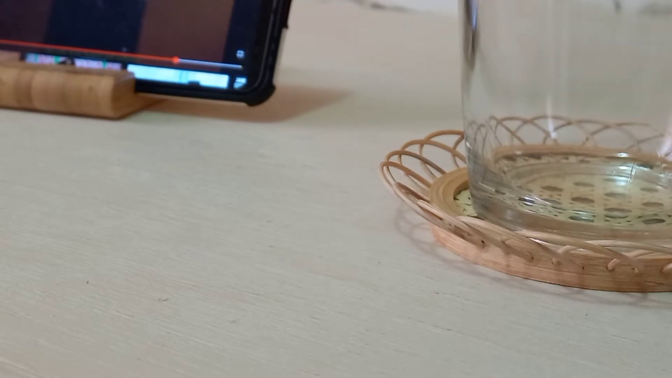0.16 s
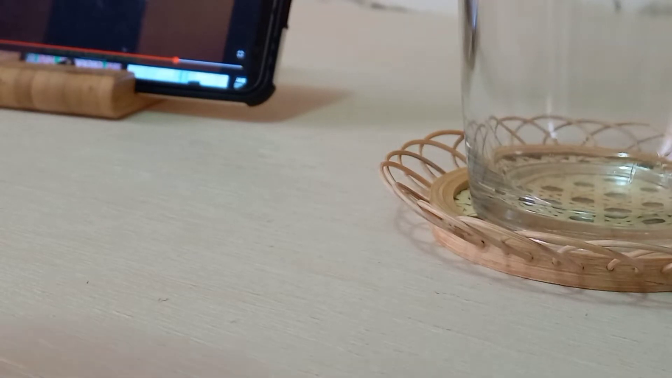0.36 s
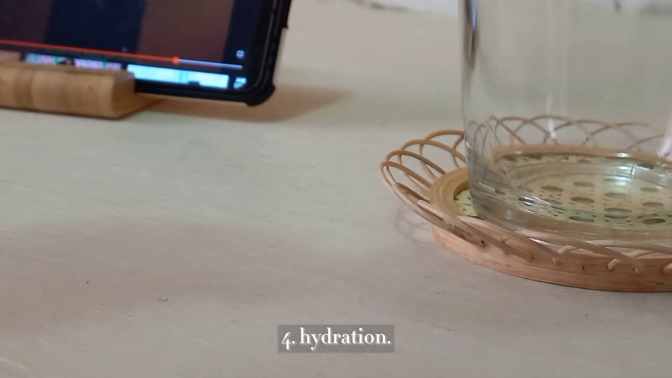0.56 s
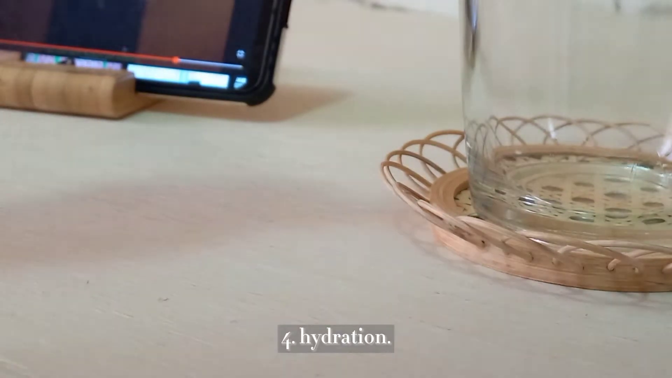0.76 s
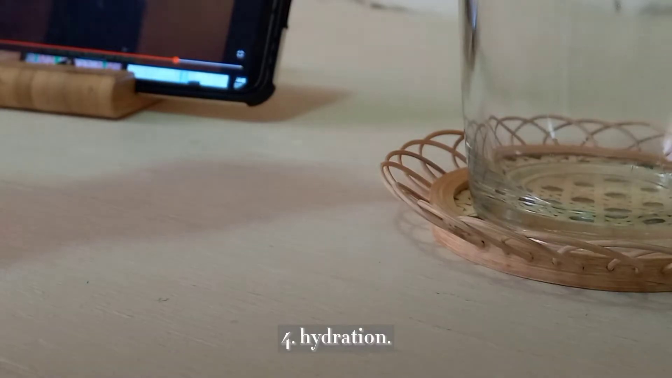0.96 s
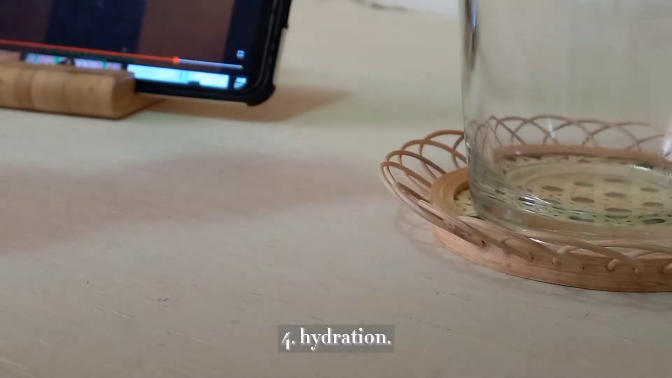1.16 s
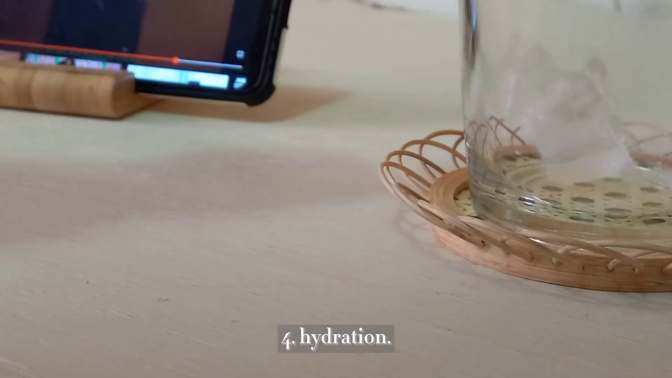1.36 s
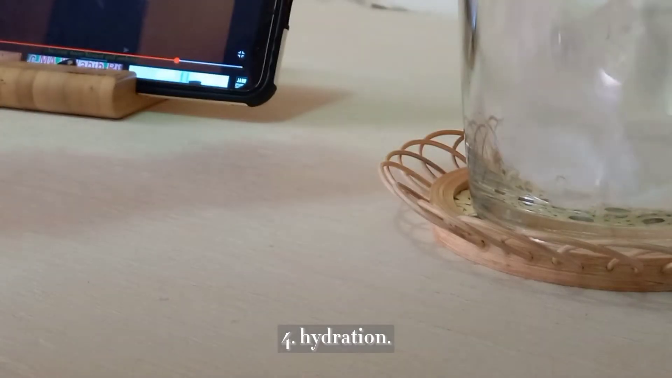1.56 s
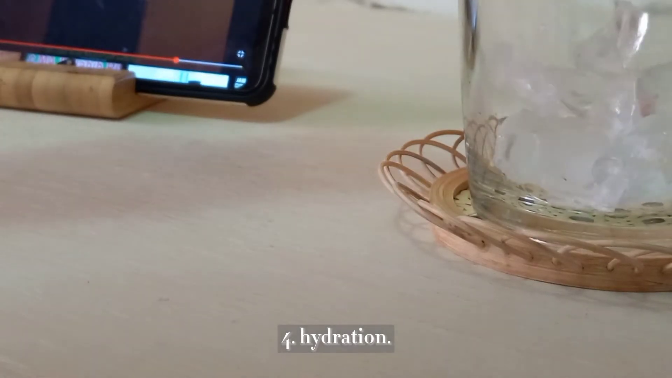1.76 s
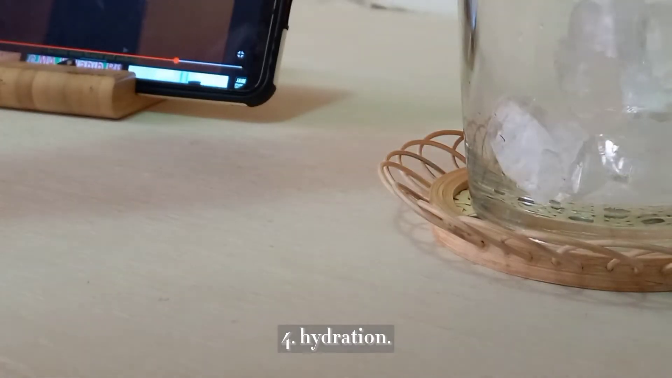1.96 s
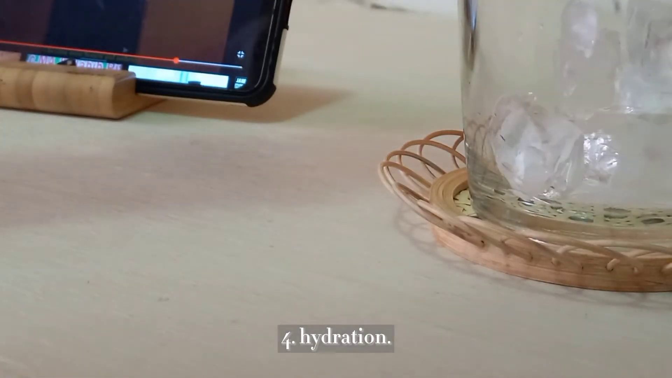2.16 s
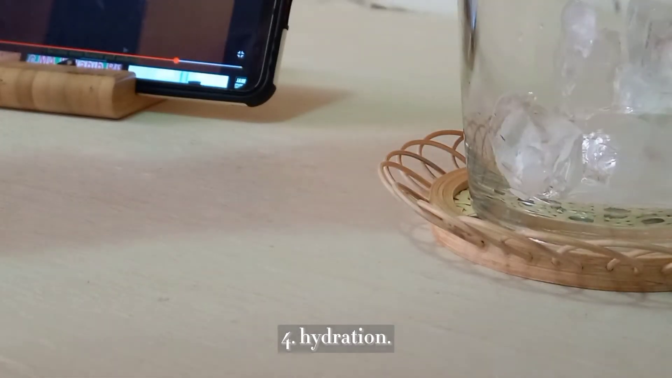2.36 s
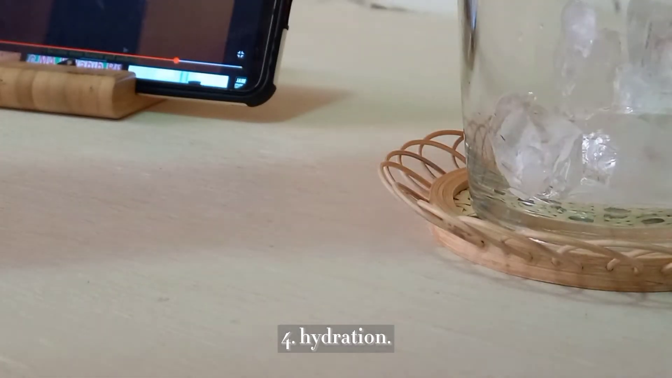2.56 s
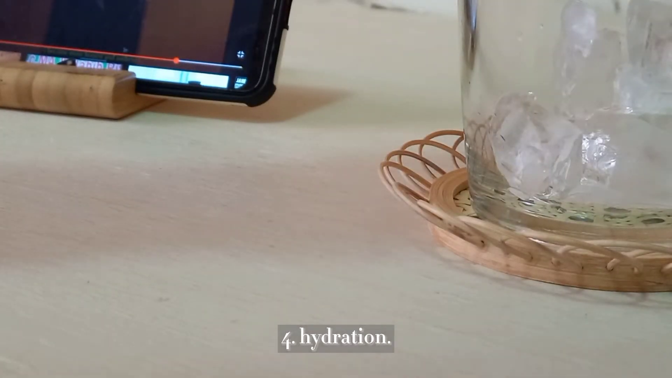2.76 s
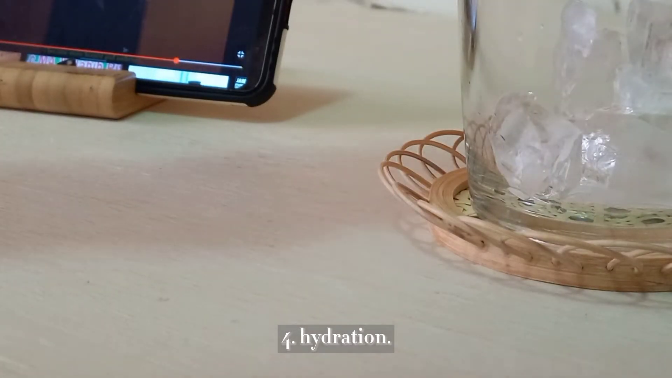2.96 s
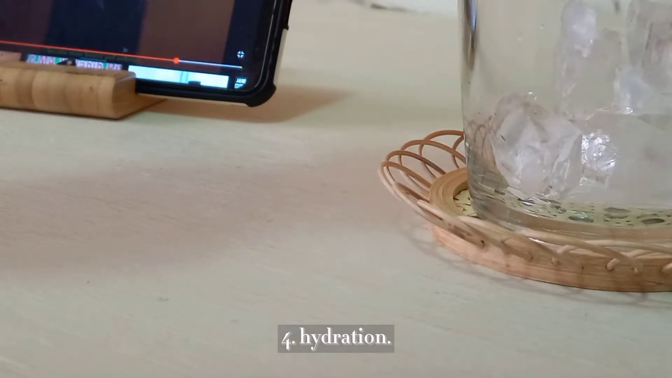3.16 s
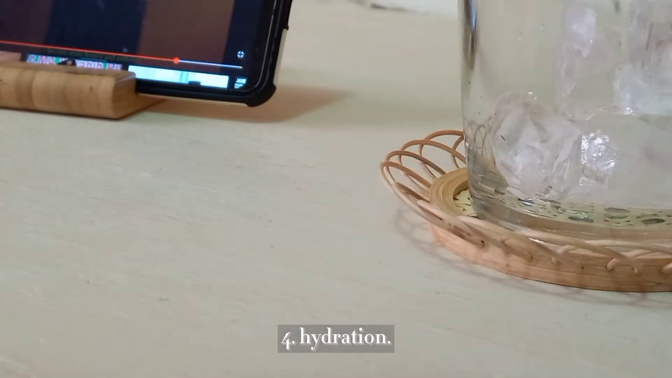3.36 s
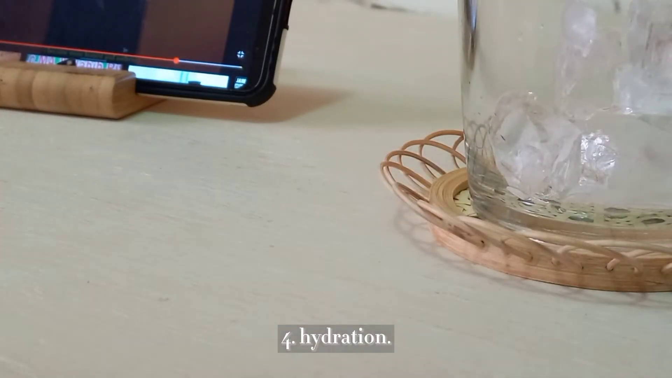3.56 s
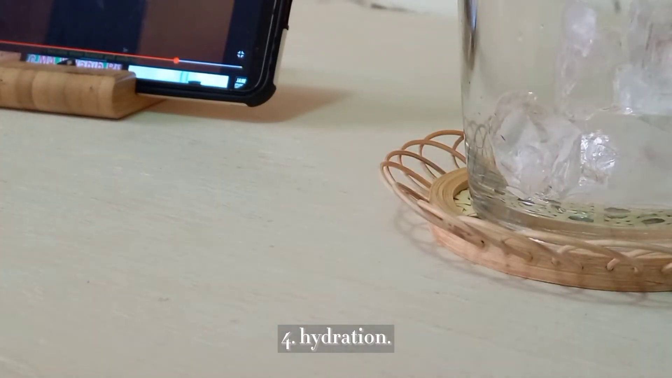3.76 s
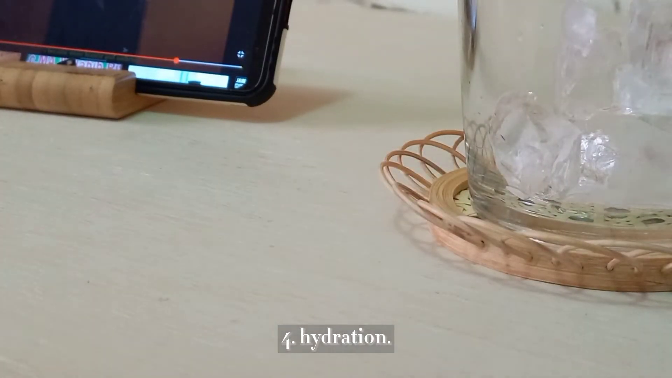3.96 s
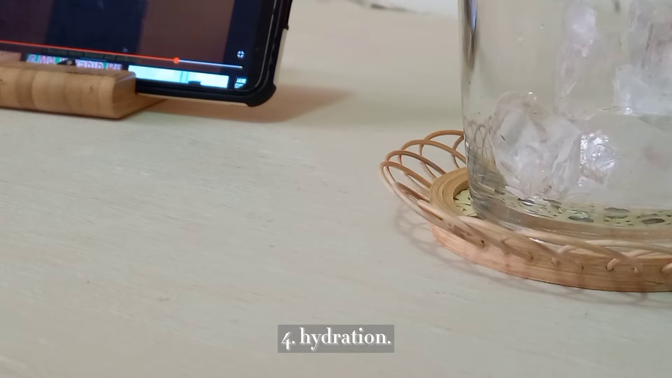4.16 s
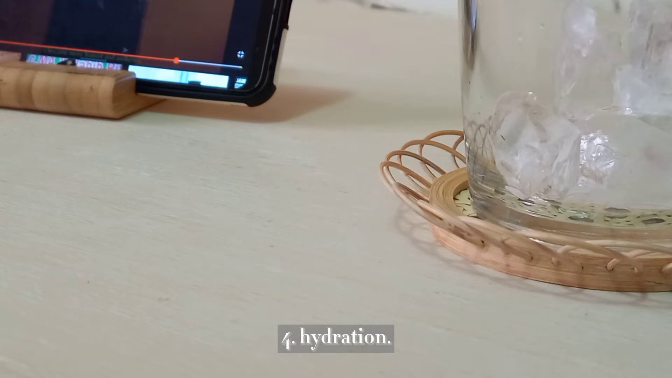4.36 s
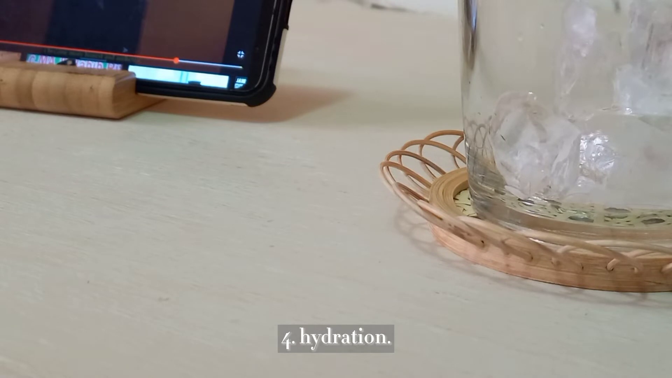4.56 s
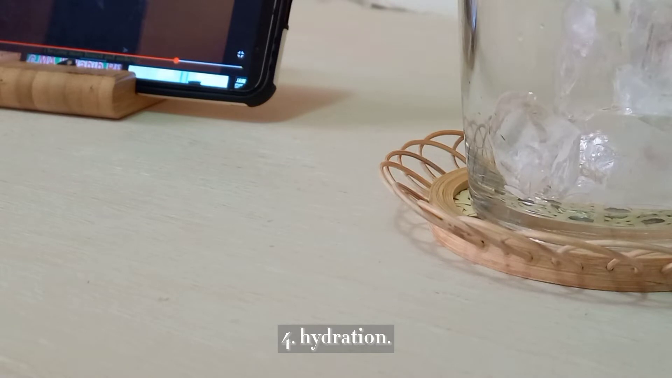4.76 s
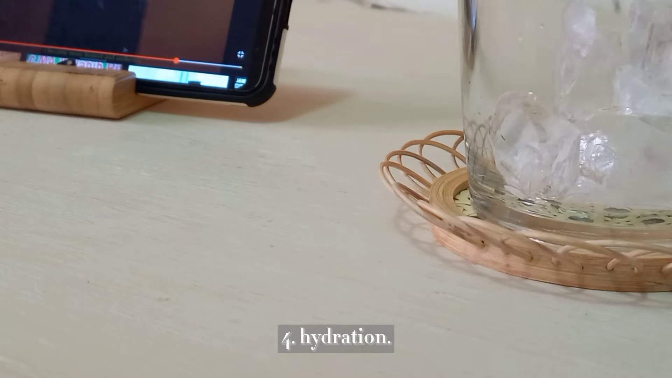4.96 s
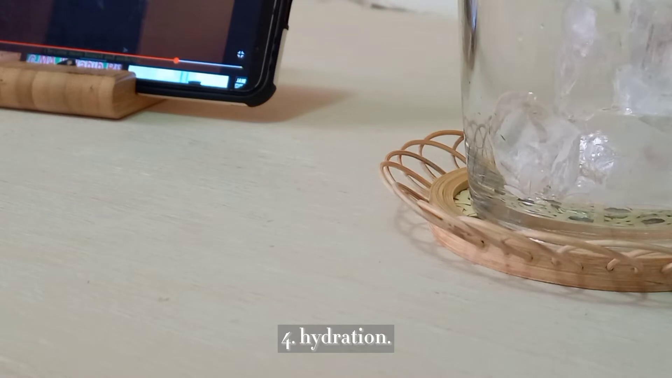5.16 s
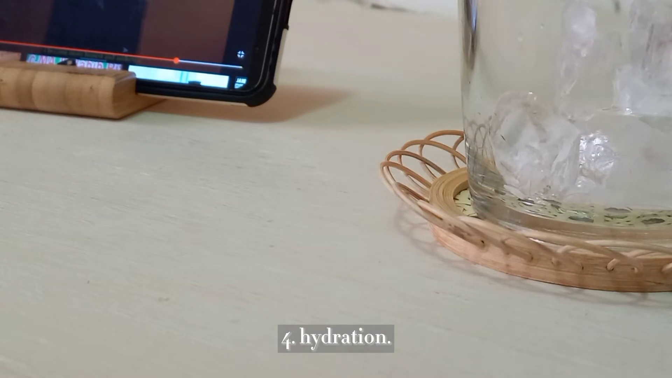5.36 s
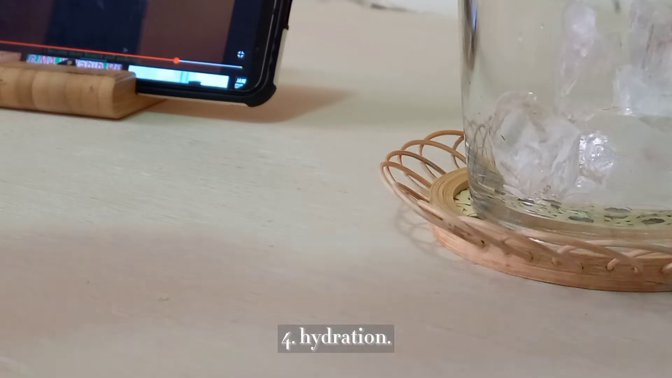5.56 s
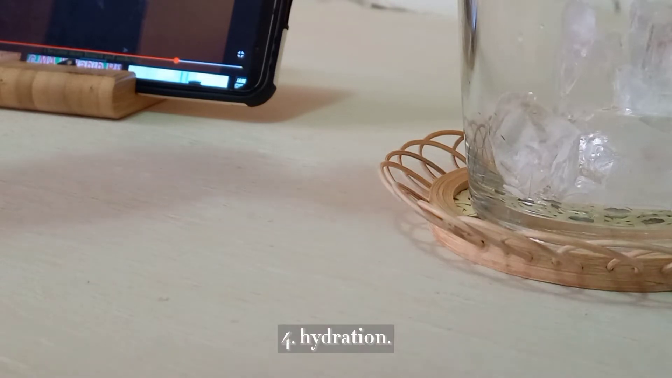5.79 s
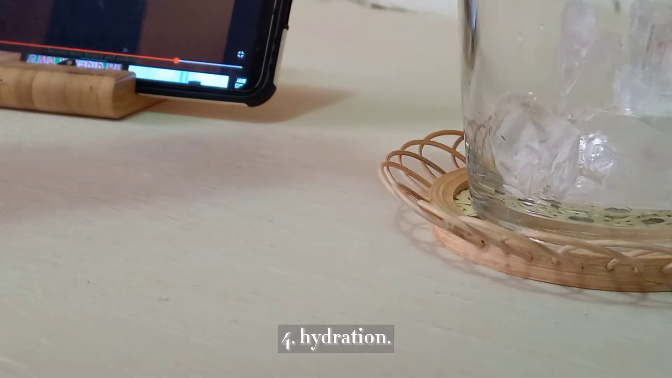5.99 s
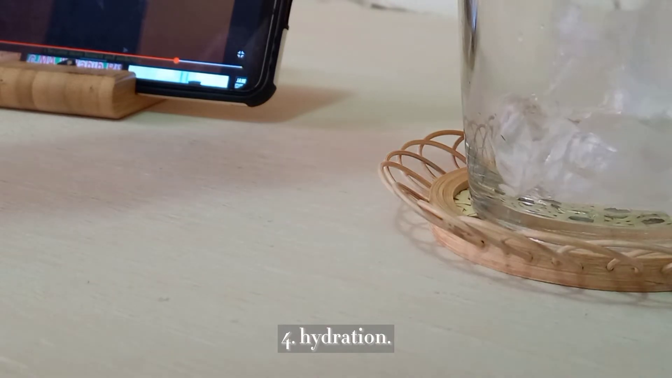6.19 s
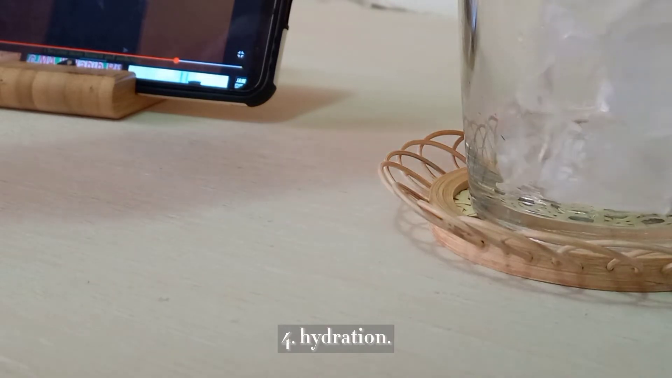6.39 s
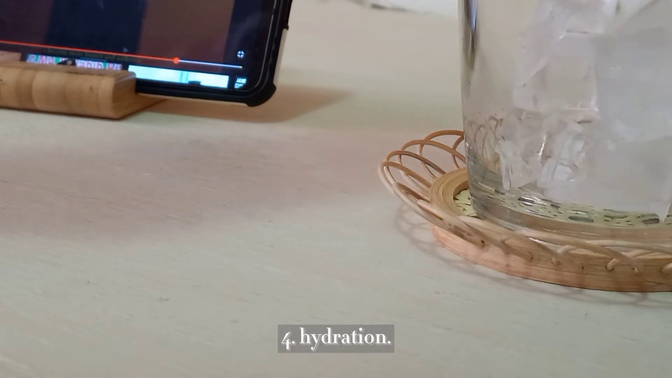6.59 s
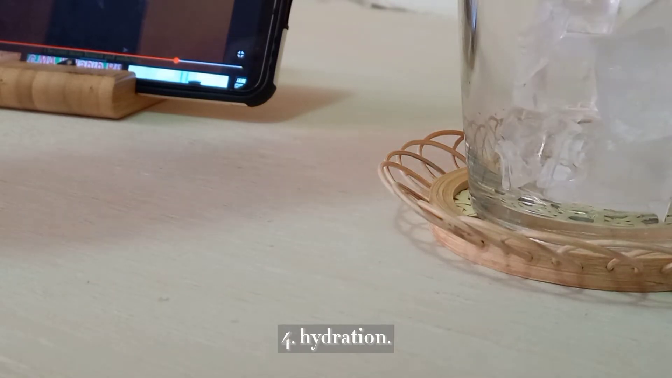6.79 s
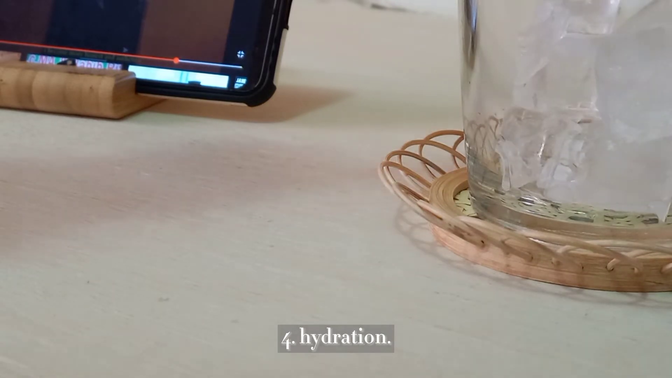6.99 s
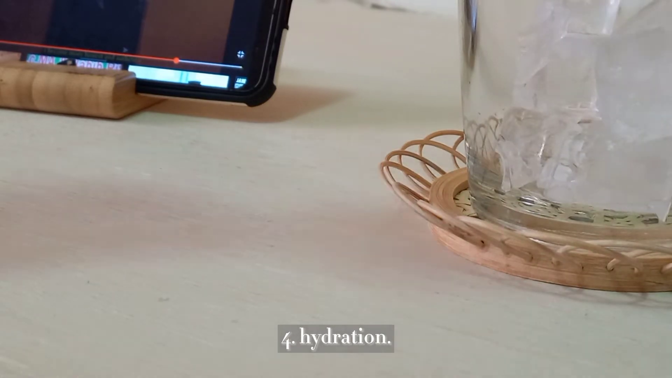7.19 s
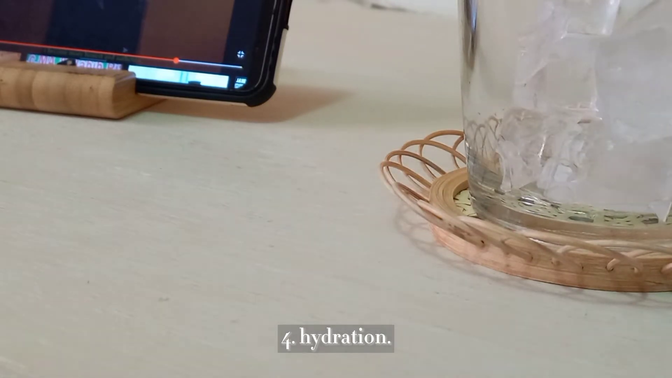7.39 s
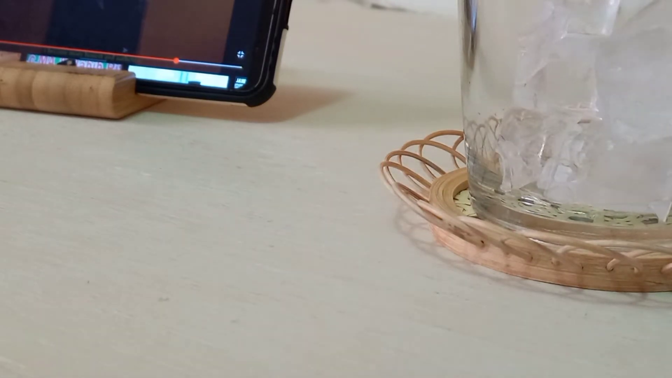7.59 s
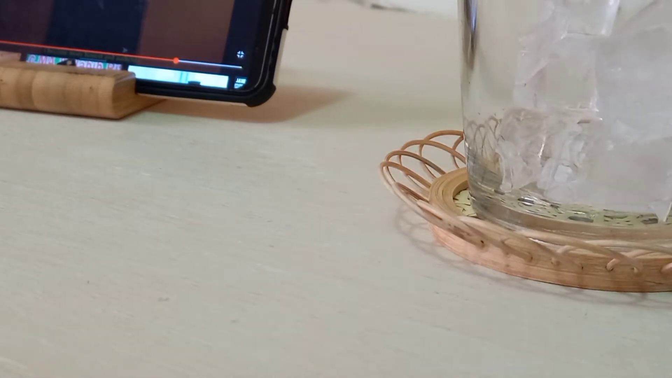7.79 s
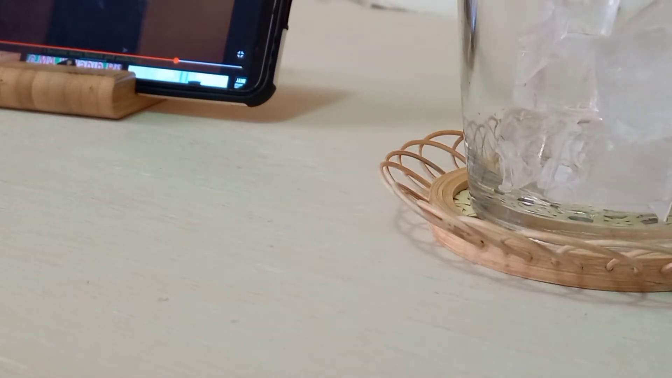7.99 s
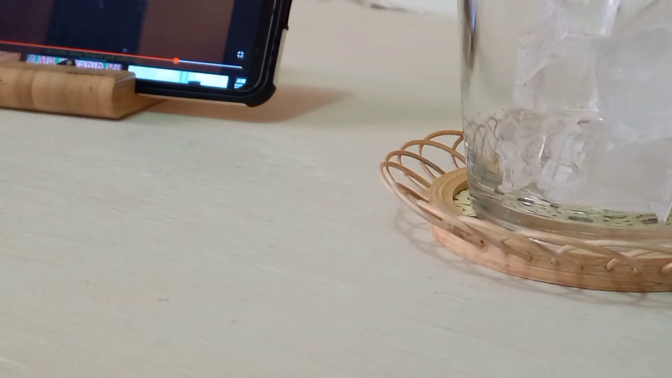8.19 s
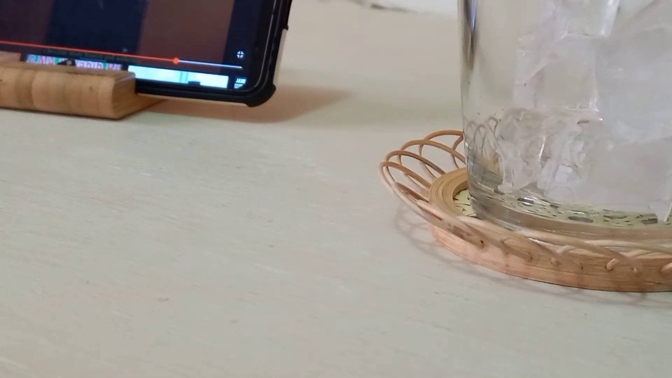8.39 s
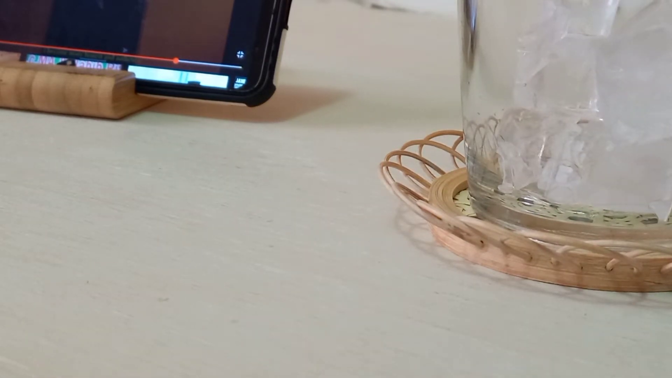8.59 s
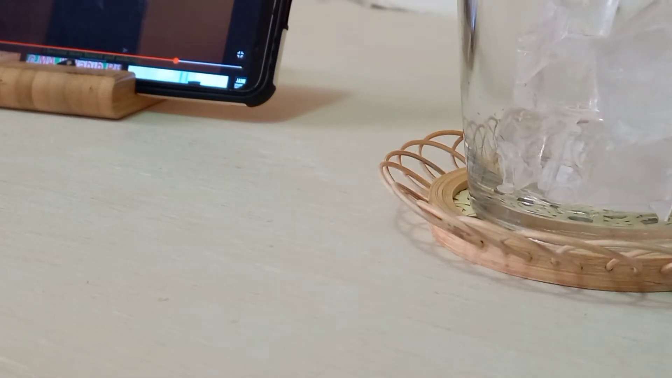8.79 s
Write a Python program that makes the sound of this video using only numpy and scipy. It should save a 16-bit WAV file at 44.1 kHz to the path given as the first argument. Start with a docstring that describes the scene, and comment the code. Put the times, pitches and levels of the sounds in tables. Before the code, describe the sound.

Quiet small room, faint hum, a dull bump or two in the background. Ice cubes then hit a glass very near the microphone: sharp ticks, clear high ringing, rattling as they settle. Further away, hands dig in a tub of ice with hollow knocks and gritty crunches. Another quick cluster of cubes clatters into the now partly filled glass, followed by a pause and softer rummaging in the ice.

```python
"""A drinking glass, close to the microphone, rings as two handfuls of ice cubes are dropped into it.
Its wall is a set of decaying modes, damped by the cubes that lean on it; each cube cracks and chatters.
The glass stands on a wicker coaster, and the table gives low notes under some of the landings.
Further away, in between and afterwards, more ice is dug out of a tub: noise grains crunch, lumps knock.
Behind it are dull bumps across the small room, noise for its air, and two low hum tones."""
import sys
import numpy as np
from scipy import signal
from scipy.fft import rfft, irfft, next_fast_len
from scipy.io import wavfile
from scipy.ndimage import uniform_filter1d

SR = 44100
rng = np.random.default_rng(int(sys.argv[2]) if len(sys.argv) > 2 else 0)


def store_wav(level_fs):
    """Save 16-bit WAV to argv[1]."""
    pcm = np.round(np.clip(np.atleast_2d(level_fs), -1, 1) * 32767)
    wavfile.write(sys.argv[1], SR, pcm.T.astype(np.int16))


N = 389844
TIME = np.arange(N) / SR


def from_db(db):
    """Decibels to gain."""
    return 10 ** (np.asarray(db) / 20)


def rms_one(x):
    """Scale to unit rms."""
    return x / np.sqrt(np.mean(x ** 2) + 1e-20)


def at_hz(points, hz):
    """Read a table on a log-frequency axis."""
    points = np.array(points)
    return np.interp(np.log(np.maximum(hz, 1)), np.log(points[:, 0]), points[:, 1])


def add(out, s, sound):
    """Mix a sound in at a time in seconds."""
    start = max(round(s * SR), 0)
    out[:, start:start + sound.shape[-1]] += sound[..., :N - start]


def pan(left_db):
    """Left and right gains of constant power, the left louder by left_db."""
    return rms_one(from_db(np.array([[left_db], [-left_db]]) / 2))


def cut(x, hz, kind, order=2):
    """Butterworth filter."""
    sections = signal.butter(order, hz, kind, fs=SR, output="sos")
    return signal.sosfilt(sections, x + 1e-18)


def coloured(x, spectrum, size=8192):
    """Minimum-phase body filter with this spectrum; white noise keeps its power."""
    hz = np.arange(size // 2 + 1) * SR / size
    gain = rms_one(from_db(at_hz(spectrum, hz)))
    # folding the cepstrum onto positive time makes the filter causal
    cepstrum = irfft(np.log(gain))
    cepstrum[1:size // 2] *= 2
    cepstrum[size // 2 + 1:] = 0
    response = irfft(np.exp(rfft(cepstrum)))
    return signal.fftconvolve(x, response[None], axes=1)[:, :N]


# likeness of the two microphone ports: (frequency [Hz], left-right likeness [0 to 1])
PORT_LIKENESS = [(100, .93), (300, 0.88), (700, 0.59), (1400, 0.025), (3000, 0)]


def two_ports(x):
    """Long waves reach both microphone ports alike, short ones do not."""
    size = next_fast_len(N)
    left, right = rfft(x, size)
    likeness = at_hz(PORT_LIKENESS, np.arange(len(left)) * SR / size)
    angle = np.arcsin(np.clip(likeness, -1, 1)) / 2
    mixed_left = left * np.cos(angle) + right * np.sin(angle)
    mixed_right = right * np.cos(angle) + left * np.sin(angle)
    return irfft([mixed_left, mixed_right], size)[:, :N]


def swells(rows, attack_s, release_t60):
    """Gain in time for rows of (start s, length s, dB): each rises, holds and dies away; powers add."""
    power = np.zeros(N)
    for start, length, db in rows:
        t = np.arange(int((length + release_t60) * SR)) / SR
        fall_db = -60 * np.maximum(t - length, 0) / release_t60
        gain = np.minimum(t / attack_s, 1) * from_db(db + fall_db)
        add(power[None], start, gain ** 2)
    return np.sqrt(power)


def snap(t60, click_db, size=4096):
    """A brittle contact: one click and a short splintering burst, of unit energy in each channel."""
    burst = rng.standard_normal((2, size)) * from_db(-60 * np.arange(size) / SR / t60)
    burst /= np.sqrt(np.sum(burst ** 2, axis=1, keepdims=True))
    burst[:, 0] = from_db(click_db)
    return burst / np.sqrt(np.sum(burst ** 2, axis=1, keepdims=True))


def note(hz, t60, size=4096):
    """One quickly dying resonance of unit energy."""
    t = np.arange(size) / SR
    wave = np.sin(2 * np.pi * hz * t) * from_db(-60 * t / t60)
    return wave / np.sqrt(np.sum(wave ** 2))


def grains(per_s, spread_db, t60):
    """Many tiny decaying noise snaps of uneven size, at an even mean level."""
    hits = rng.random(N) < per_s / SR
    sizes = from_db(spread_db * np.minimum(rng.exponential(1, N), 4)) * hits
    # power falls 60 dB in t60
    power = signal.lfilter([1], [1, -from_db(-120 / (t60 * SR))], sizes ** 2 + 1e-12)
    mean_power = np.maximum(uniform_filter1d(power, size=3001), 1e-9)
    return np.sqrt(power / mean_power) * rng.standard_normal((2, N))


def clatter(per_s, spread_db, low_hz, high_hz, cycles, count=24):
    """Small collisions, each ringing one of many cube notes for a few cycles; even mean level."""
    hits = rng.random(N) < per_s / SR
    sizes = from_db(spread_db * np.minimum(rng.exponential(1, N), 3)) * hits
    sizes = sizes / np.sqrt(np.maximum(uniform_filter1d(sizes ** 2, size=2001), 1e-4))
    dealt, out = rng.integers(0, count, N), np.zeros((2, N))
    for k, hz in enumerate(np.geomspace(low_hz, high_hz, count)):
        # a two-pole resonator that falls 60 dB in this many cycles
        radius, angle = from_db(-60 * hz / (cycles * SR)), 2 * np.pi * hz / SR
        gain = np.sqrt((1 - radius * radius) / 2)
        poles = [1, -2 * radius * np.cos(angle), radius * radius]
        ringing = signal.lfilter([gain, 0, -gain], poles, sizes * (dealt == k) + 1e-18)
        out += ringing * [[1], [(-1) ** k]]  # every other note is inverted on the right
    return out


def room(x, t60, treble_t60, wet_db):
    """Diffuse reflections of a small room; the treble of the tail lasts longer."""
    t = TIME[:SR // 2]
    noise = rng.standard_normal((2, len(t))) * np.clip(t / 0.0043 - .5, 0, 1)
    low_tail = cut(noise, 3100, "low") * from_db(-60 * t / t60)
    treble_tail = cut(noise, 2300, "high", order=1) * from_db(-60 * t / treble_t60)
    tail = low_tail + treble_tail
    tail /= np.sqrt(np.sum(tail ** 2) / 2)
    return x + from_db(wet_db) * signal.fftconvolve(x, tail, axes=1)[:, :N]


# spectrum of the room air: (frequency [Hz], level [dB per Hz, relative])
AIR_COLOUR = [(18, -41), (30, -9), (59, -13), (79, -21.5), (115, 2), (145, -21), (311, -12.5), (426, -20),
              (461, -8.5), (526, -16.5), (1720, -19.5), (3580, -39.5), (7270, -46.5), (8300, -42.5),
              (16000, -58)]
# hum tones: (frequency [Hz], level [dB rms])
HUM_TONES = [(55, -62.5), (113, -63)]


def room_air():
    """Steady air noise and the hum of an appliance, whose phase wavers."""
    air = from_db(-53.5) * coloured(two_ports(rng.standard_normal((2, N))), AIR_COLOUR)
    for hz, hum_db in HUM_TONES:
        waver = rms_one(cut(rng.standard_normal(N), 33.0, "low"))
        tone = np.sin(2 * np.pi * hz * TIME + 0.56 * waver)
        air = air + from_db(hum_db) * np.sqrt(2) * tone
    return air


# bumps further off in the room: (start [s], length [s], level [dB, relative], rattle over rumble [dB])
DISTANT_BUMPS = [(0.143, 0.081, -48.5, 1.5), (0.544, 0.041, -32, -4.5), (2.605, 0.064, -50.5, -15),
                 (3.126, 0.32, -57.5, -11.5)]
# spectrum of the bumps: (frequency [Hz], level [dB per Hz, relative])
BUMP_SPECTRUM = [(53, -29), (90, -10), (214, -5), (300, 0), (378, -7), (477, -7), (641, -13), (744, -13.5),
                 (999, -13.5), (2050, -20.5), (14000, -42.5)]


def bumps():
    """Something heavy is moved further off: a dull noise rumble, with a rattle above it."""
    attack_s, release_t60 = .016, 0.84
    noise = two_ports(rng.standard_normal((2, N)))
    rumble_rows = [(s, length, db) for s, length, db, _ in DISTANT_BUMPS]
    rattle_rows = [(s, length, db + rattle_db) for s, length, db, rattle_db in DISTANT_BUMPS]
    rumble = swells(rumble_rows, attack_s, release_t60) * cut(noise, 524, "low")
    rattle = swells(rattle_rows, attack_s, release_t60) * cut(noise, 495, "high")
    return from_db(5.0) * coloured(rumble - rattle, BUMP_SPECTRUM)


# cubes knocking in the tub: (time [s], crack level [dB, relative], knock level [dB, relative], note [Hz])
TUB_KNOCKS = [(3.5778, -21, -14.5, 1223), (3.6447, -21, -22.5, 860), (3.65, -17.5, -19, 845),
              (3.674, -18, -21, 835), (3.737, -27, -27, 805), (3.7504, -38, -21, 1220),
              (3.815, -16.5, -21.5, 1390), (3.8427, -36, -23, 1100), (3.9073, -18, -18.5, 590),
              (3.9134, -12, -22, 850), (4.0184, -19, -28, 697), (4.1037, -20.5, -24, 864),
              (4.2494, -13.5, -19, 1650), (4.2864, -31, -26, 855), (4.3466, -28, -17, 1240),
              (4.3566, -25, -22.5, 817), (4.4217, -22, -16.5, 1380), (4.4944, -9.5, -8.5, 1038),
              (4.5875, -34, -18, 1100), (4.6223, -22, -19, 1330), (4.6673, -13, -19, 674),
              (4.7072, -36, -28, 686), (4.7598, -24, -23.5, 2140), (4.8845, -15.5, -21, 1070),
              (4.937, -15, -21, 870), (4.9464, -19, -19.5, 1240), (5.004, -22, -21, 846),
              (5.028, -21, -16.5, 876), (5.0578, -27, -21, 860), (5.0685, -7.5, -11.5, 606),
              (5.0981, -9.5, -16, 774), (5.1576, -9, -13, 700), (5.1683, -20, -17.5, 900),
              (5.22, -21, -20.5, 857), (5.3772, -44, -61, 902), (5.5917, -40, -58.5, 775),
              (5.6398, -28, -60, 1080), (5.8052, -44.5, -62, 915), (5.8785, -42.5, -60, 1130),
              (6.0101, -31.5, -43.5, 1990), (7.8639, -21.5, -29.5, 934), (7.888, -21, -29, 955),
              (8.0094, -30, -33, 977), (8.1474, -43, -27, 2480), (8.2272, -25.5, -26.5, 906),
              (8.2499, -20.5, -19.5, 1350), (8.2604, -22, -20.5, 900), (8.3492, -35, -22, 944),
              (8.3863, -13, -15, 876), (8.461, -21, -26.5, 940), (8.6387, -13.5, -12.5, 1940),
              (8.683, -23, -26, 2100)]
# bands of the hollow, middle and crack of a knock: (low edge [Hz], high edge [Hz])
KNOCK_BANDS = [(290, 750), (750, 2500), (2500, 16000)]
# decay of the hollow, middle and crack: t60 [s]
KNOCK_DECAYS = [.035, .03, .024]
# bigger lumps have a lower note and make the tub boom more
HOLLOW_DB_PER_OCTAVE, MEAN_NOTE_HZ = 11, 1050


def knocks(hollow_db, middle_db, note_db, crack_db, note_t60):
    """Cubes break loose and hit the tub: a sharp crack over a hollow knock, each lump with its own note."""
    hollow, middle, crack, notes = np.zeros((4, 2, N))
    hollow_t60, middle_t60, crack_t60 = KNOCK_DECAYS
    for s, lump_crack_db, knock_db, hz in TUB_KNOCKS:
        boom_db = HOLLOW_DB_PER_OCTAVE * np.log2(MEAN_NOTE_HZ / hz)
        add(hollow, s, from_db(knock_db + boom_db + hollow_db) * snap(hollow_t60, click_db=-9.0))
        add(middle, s, from_db(knock_db + middle_db) * snap(middle_t60, click_db=-18.0))
        add(crack, s, from_db(lump_crack_db + crack_db) * snap(crack_t60, click_db=-10.5))
        add(notes, s, from_db(knock_db + note_db) * note(hz, note_t60))
    layers = zip((hollow, middle, crack), KNOCK_BANDS)
    hollow, middle, crack = (cut(x, band, "band") for x, band in layers)
    return notes + hollow - middle + crack


# pushes into the ice, from firm digging to light sifting:
# (start [s], length [s], level [dB, relative], crackle over body [dB, relative])
ICE_PUSHES = [(3.64, .045, -30, -3), (3.735, 0.032, -34.5, 3.5), (3.835, 0.1, -25, -2.5),
              (3.89, 0.046, -30, 8), (3.99, 0.22, -35.5, -0.5), (4.25, .04, -32, 4), (4.35, .1, -30.5, 1),
              (4.46, 0.11, -33.5, 3), (4.65, 0.04, -31, -4), (4.77, 0.42, -37, -2.5),
              (5.0, 0.064, -33, 5.5), (5.093, 0.031, -25.5, 0.5), (5.154, 0.022, -29, -4.5),
              (5.63, 0.022, -72.5, 26.5), (5.885, .06, -74.5, 21), (5.98, .1, -66, 17),
              (7.885, 0.17, -40.5, -5), (8.14, 0.072, -46, 0.5), (8.24, 0.089, -35.5, -1.5),
              (8.333, 0.071, -30, -9), (8.45, 0.088, -40, -5.5), (8.59, 0.12, -39, -4.5)]
# spectrum of the tub full of ice: (frequency [Hz], level [dB per Hz, relative])
TUB_COLOUR = [(71, -40), (120, -12.5), (167, -19), (231, -5.5), (289, -12.5), (463, -9), (503, -4.5),
              (592, -12), (670, -5), (1070, -5), (1550, -7), (3660, -12), (6370, -16.5), (14200, -22),
              (16000, -31.5)]


def tub(lag_s=0.00018):
    """Each push grinds and clacks the cubes together; all of it sounds through the tub, off to the left."""
    attack_s, release_t60, crackle_from_hz = 0.0067, 0.31, 2500
    clacks = from_db(-3.5) * clatter(per_s=400, spread_db=4.5, low_hz=420, high_hz=5300, cycles=14)
    crunch = grains(per_s=450, spread_db=4.5, t60=0.025) + clacks
    body_rows = [(s, length, db) for s, length, db, _ in ICE_PUSHES]
    crackle_rows = [(s, length, db + crackle_db) for s, length, db, crackle_db in ICE_PUSHES]
    grinding = swells(body_rows, attack_s, release_t60)
    splintering = swells(crackle_rows, attack_s, release_t60)
    body = from_db(-2.77) * grinding * cut(crunch, crackle_from_hz, "low")
    crackle = from_db(-3.5) * splintering * cut(crunch, crackle_from_hz, "high")
    blows = knocks(hollow_db=18.5, middle_db=23.0, note_db=7.0, crack_db=14.5, note_t60=0.046)
    left, right = coloured(two_ports(body - crackle + blows), TUB_COLOUR) * pan(2.6)
    # the sound reaches the right port later
    return np.array([left, np.interp(TIME - lag_s, TIME, right)])


# weight landing on the table: (time [s], level [dB, relative])
TABLE_THUMPS = [(0.948, -30.5), (1.207, -31), (1.385, -41), (1.421, -31), (1.59, -40), (1.796, -42),
                (1.866, -39), (6.284, -42), (6.347, -47)]


def table(hz, t60, thump_db):
    """The table top gives a short low note under each landing, of slightly varying pitch."""
    out, t = np.zeros((2, N)), TIME[:SR // 2]
    for s, landing_db in TABLE_THUMPS:
        pitch_hz = hz * (1 + 0.092 * rng.standard_normal())
        gain = from_db(landing_db + thump_db - 60 * t / t60)
        add(out, s, gain * np.sin(2 * np.pi * pitch_hz * t))
    return out


def singing_wall(motion, per_s, second_db, t60):
    """Once the first cube is at the bottom, light touches keep the low modes singing between blows."""
    first_landing_s = 1.138
    touches = rms_one(rng.standard_normal((2, N)) * (rng.random(N) < per_s / SR))
    first_edge_hz, second_edge_hz = MODE_GROUP_EDGES[:2]
    modes = sum(from_db(db + second_db * (hz > first_edge_hz)) * note(hz, t60 * share, size=16384)
                for hz, db, share in GLASS_MODES if hz < second_edge_hz)
    driven = touches * motion * (TIME > first_landing_s)
    return signal.fftconvolve(driven, modes[None], axes=1)[:, :N]


# cubes tumbling over each other in the glass: (start [s], length [s], level [dB, relative])
CUBE_TUMBLES = [(.83, 0.17, -52), (.95, 0.2, -42.5), (1.08, .04, -39), (1.205, 0.13, -35),
                (1.38, .045, -27.5), (1.51, 0.14, -39.5), (1.83, .1, -46.5), (6.152, 0.27, -41.5)]


def jostle():
    """Cubes rub and chatter against each other and the wall as they settle."""
    rubbing = grains(per_s=390, spread_db=2.0, t60=0.039)
    chatter = from_db(-6.5) * clatter(per_s=400, spread_db=1.0, low_hz=973, high_hz=5850, cycles=35)
    motion = swells(CUBE_TUMBLES, attack_s=0.0052, release_t60=0.18)
    singing = singing_wall(motion, per_s=300, second_db=-5, t60=.25)
    return from_db(0.5) * coloured(two_ports((rubbing + chatter) * motion), ICE_COLOUR) + singing


# spectrum of a bare ice contact: (frequency [Hz], level [dB per Hz, relative])
ICE_COLOUR = [(150, -0.5), (750, -6), (1080, 5.5), (1500, -4.5), (2700, 1.5), (4200, -3), (6500, -6.5),
              (8300, -4.5), (10300, -11.5), (12300, -11), (15000, -8), (16500, -20.5)]


def cube_ticks(contact_db, contact_t60, low_note_db, high_note_db, note_t60):
    """The cube itself cracks against the wall and gives two short notes, the upper one set by its size."""
    cracks, notes = np.zeros((2, 2, N))
    for s, tick_db, *_, cube_hz in CUBE_BLOWS:
        add(cracks, s, from_db(tick_db + contact_db) * snap(contact_t60, click_db=-10.5))
        add(notes, s, from_db(tick_db + low_note_db) * note(rng.uniform(950, 1300), note_t60))
        add(notes, s, from_db(tick_db + high_note_db) * note(cube_hz, note_t60))
    return coloured(two_ports(cracks), ICE_COLOUR) + notes


# cube on glass: (time [s], tick level [dB, relative], ring level [dB, relative], second group over ring [dB],
# third and top groups over ring [dB], left over right in the first group [dB], cube note [Hz])
CUBE_BLOWS = [(0.9215, -25.5, -55, 2, 5.5, 1, 2240), (0.9482, -10, -37.5, -13.5, 3, -11, 2290),
              (1.036, -29, -39.5, -28, -1, -5, 2240), (1.0875, -19, -20, -29, -19, -5, 2500),
              (1.1381, -21, -30, -12, -5.5, -6.5, 2350), (1.2093, -8.5, -27, -17, 1, -11.0, 2360),
              (1.284, -12.5, -30.5, -28, -11, -10, 3600), (1.3442, -16.5, -18, -24, -4.5, -7, 2290),
              (1.3634, -14.5, -23, -7.5, -12, 7.5, 2220), (1.3845, -17, -23.5, -7, 0.5, 8.5, 2230),
              (1.4046, -39, -16.5, -6, -3.5, 1, 2340), (1.4184, -33, -22, -4, -3.5, 14.5, 2826),
              (1.4802, -27, -28.5, -18, -9, -7, 2950), (1.509, -16, -34, -22, -20.5, 1, 2700),
              (1.5229, -26, -33.5, -22, 0.5, -7, 2820), (1.5715, -24, -19.5, -2.5, -7.5, -14, 2240),
              (1.5916, -17, -28.5, -2, -1.5, -2.5, 2180), (1.7984, -18.5, -57, 6, -9, 2, 2800),
              (1.8317, -26, -40.5, 6.5, 10.5, 1, 2300), (1.8437, -44, -23.5, -7, -6, -2.0, 2200),
              (1.867, -30, -32.5, -4, -6, -3, 2550), (1.8833, -41, -31.5, -11, -10, -4, 2800),
              (1.944, -39, -42.5, -14, -8.5, -1, 2200), (2.4124, -65.5, -67.5, -8, 5, -1.5, 2250),
              (2.6943, -67, -63.5, -2.5, -13.5, 2, 2510), (6.1512, -20.5, -31.5, 3, 3, -14, 2520),
              (6.187, -18.5, -24, -2.5, 0, -11.5, 2740), (6.2405, -17, -17, -8, -6.5, -15, 2550),
              (6.2849, -37, -16.5, -7, 2.5, -9.5, 2180), (6.3124, -19, -21.5, -5, -15.5, -28, 2320),
              (6.3441, -17.5, -17.5, 0.5, 4, -7, 2740), (6.4054, -29, -37, -1, -1, 7, 2210),
              (6.4344, -38, -20.5, -7.5, -1, -4, 2230), (6.4986, -33, -41, 4, 1, -10, 2590),
              (6.5338, -40, -41.5, -3, -19, -4.0, 2640), (6.579, -41, -42, -2.5, 0, -14.5, 2210),
              (6.6098, -48, -47, 0, -17.5, -1.5, 2230)]
# modes of the glass wall: (frequency [Hz], level [dB, relative], t60 as a share of the ring [ratio])
GLASS_MODES = [(1050, -20, .3), (1966, 0, 1.0), (2560, -23, .2), (4606, 0, .75), (5248, -20, .4),
               (8072, -2, .35), (8450, -9, .25), (11720, -11, .5), (11850, -10, .6), (12160, -9, .5),
               (12347, -5, .6), (12644, -8, .6), (13350, -11, .4), (14507, -3, .4)]
# borders between the first, second, third and top groups of modes: frequency [Hz]
MODE_GROUP_EDGES = [3500, 6500, 10000]
# share of a blow that each group takes, lowest first: level [dB]
MODE_GROUP_LEVELS = [-1.0, -1.0, -6.0, -9.0]
# longest decay of each group, lowest first: t60 [s]
LONGEST_RINGS = [.6, .4, .07, .13]
# each handful piling up against the wall:
# (time [s], t60 of the ring [s], level that the top group gains and the third loses [dB])
FIRST_HANDFUL = [(.95, 0.3, 1.5), (1.087, 0.011, 2), (1.139, 0.91, 3.5), (1.344, .3, 1.5), (1.41, 0.16, 4),
                 (1.5, 0.33, 6.5), (1.575, 0.24, 0), (1.85, 0.068, -4.5), (2.4, 0.14, -4.5)]
SECOND_HANDFUL = [(6.15, 0.29, -3), (6.241, 0.28, -4.5), (6.29, 0.12, -2), (6.345, .08, -2),
                  (6.434, 0.037, -6.5), (6.61, 0.025, -11)]
# from blow to blow: spread of the two high groups' strength (dB), of the upper modes between the ports (dB),
# and of every mode's pitch (share)
SCATTER_DB, LOBE_SPREAD_DB, DETUNE = 1.5, 4, .001


def glass(ring_db, right_db):
    """Each blow rings the wall anew with its own overtones; the leaning cubes damp and detune the modes."""
    out, t = np.zeros((2, N)), TIME[:SR // 3]
    next_blows = [row[0] for row in CUBE_BLOWS[1:]] + [N / SR]
    fill_s, fill_t60, fill_tilt = np.transpose(FIRST_HANDFUL + SECOND_HANDFUL)
    for (s, _, blow_db, second_db, top_db, side_db, _), next_s in zip(CUBE_BLOWS, next_blows):
        t60 = np.interp(s, fill_s, fill_t60)
        tilt_db = np.interp(s, fill_s, fill_tilt)
        # the ring builds up at the contact and is choked by the next blow
        onset = 1 - np.exp(-t / 0.00028)
        choke = np.exp(-np.maximum(s + t - next_s, 0) / 0.00049)
        overtones_db = (0, second_db, top_db - tilt_db, top_db + tilt_db)
        for hz, mode_db, share in GLASS_MODES:
            group = np.searchsorted(MODE_GROUP_EDGES, hz)
            strength, side, load, lag = rng.standard_normal(4)
            colour_db = MODE_GROUP_LEVELS[group] + overtones_db[group]
            scatter_db = SCATTER_DB * strength * (group > 1)
            gain = from_db(ring_db + blow_db + mode_db + colour_db + scatter_db)
            # the lobes of each upper mode face the two ports differently on every blow
            ports = pan(side_db if group == 0 else LOBE_SPREAD_DB * side - right_db)
            phase = np.array([[-1], [1]]) * (0.56 + .5 * group * lag)
            wave = np.sin(2 * np.pi * hz * (s + (1 + DETUNE * load) * t) + phase)
            decay = from_db(-60 * t / min(t60 * share, LONGEST_RINGS[group]))
            add(out, s, gain * ports * wave * onset * choke * decay)
    return out


def scene():
    """The glass is close to the microphone, the tub further away."""
    far = room(tub(), t60=0.17, treble_t60=0.28, wet_db=-4.0)
    near = table(hz=119.5, t60=0.26, thump_db=2.5) + jostle()
    near = near + cube_ticks(contact_db=10.0, contact_t60=0.021, low_note_db=4.0, high_note_db=1.0, note_t60=0.05)
    near = near + glass(ring_db=9.0, right_db=4.5)
    return room_air() + bumps() + far + room(near, t60=0.2, treble_t60=0.27, wet_db=-8.5)


def record(dry):
    """The loudest peaks are rounded; the deepest bass and the top are cut."""
    rounded = .85 * np.tanh(dry / .85)
    no_deep_bass = cut(rounded, 47, "high", order=8)
    top_cut = signal.ellip(10, .3, 80, 15900, fs=SR, output="sos")  # steep low-pass at 15900 Hz
    return signal.sosfilt(top_cut, no_deep_bass)


dry = scene()
out = record(dry)
store_wav(out)
```